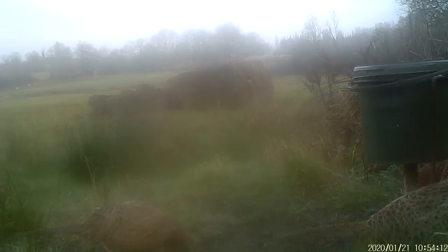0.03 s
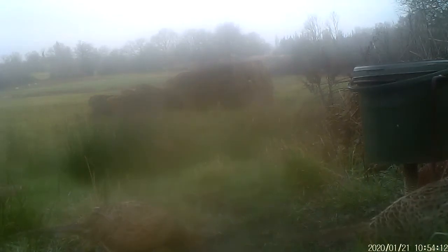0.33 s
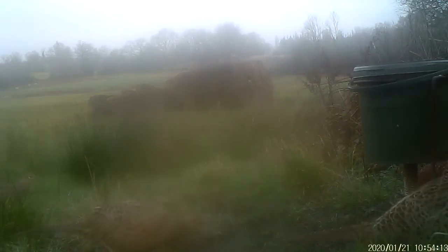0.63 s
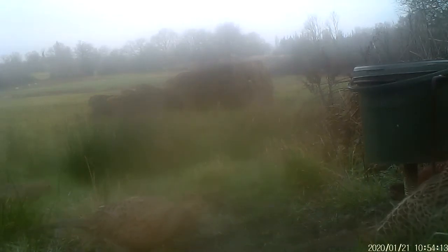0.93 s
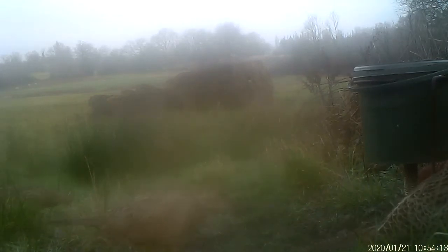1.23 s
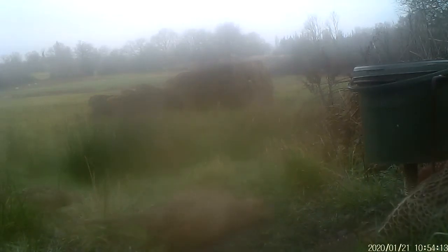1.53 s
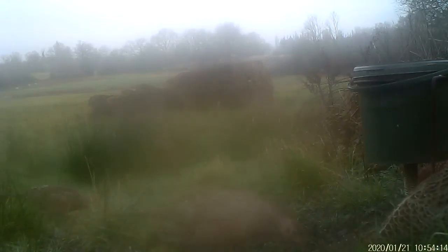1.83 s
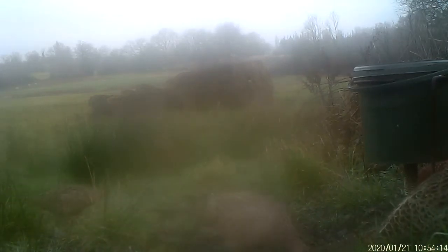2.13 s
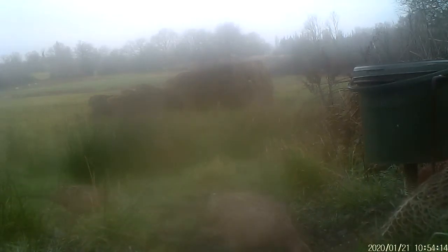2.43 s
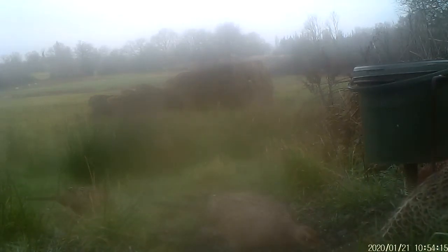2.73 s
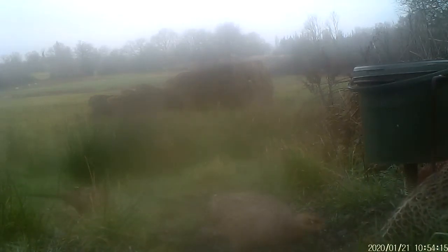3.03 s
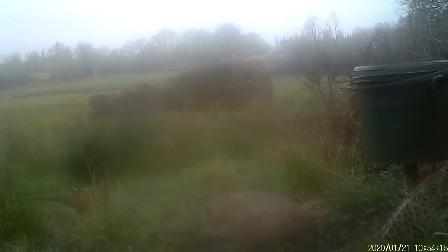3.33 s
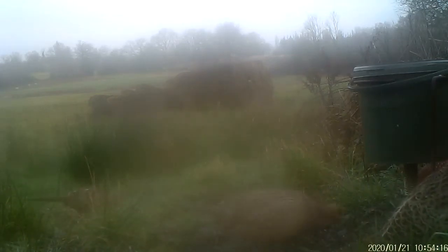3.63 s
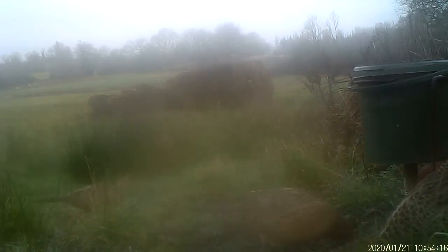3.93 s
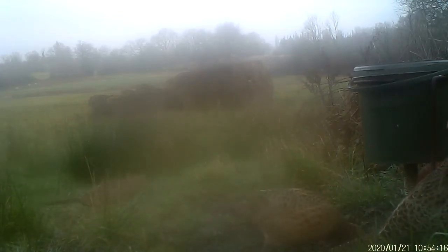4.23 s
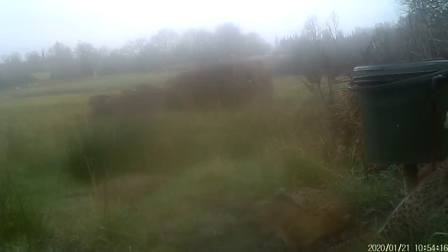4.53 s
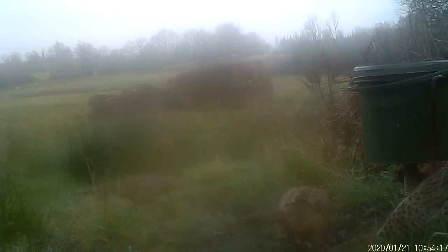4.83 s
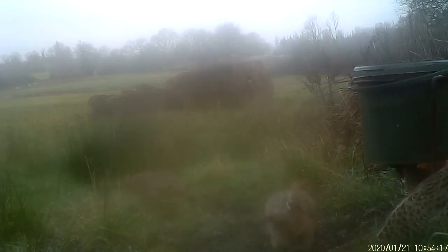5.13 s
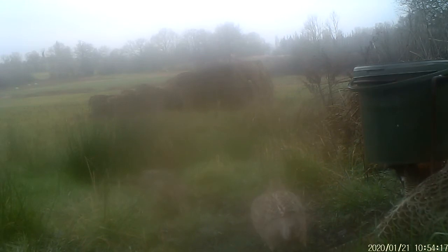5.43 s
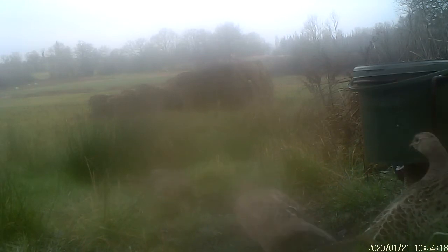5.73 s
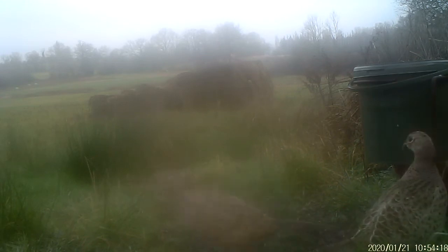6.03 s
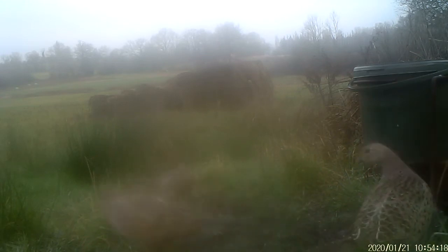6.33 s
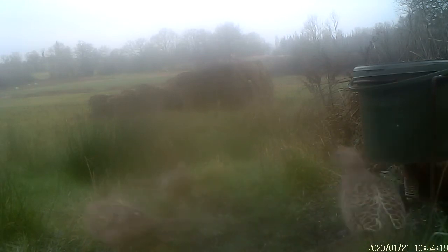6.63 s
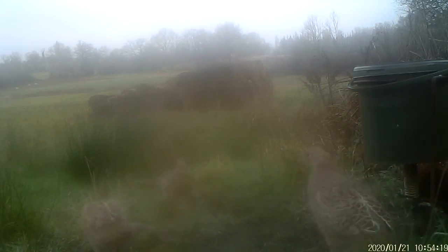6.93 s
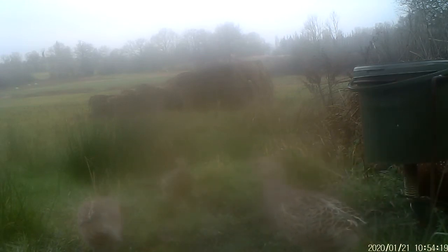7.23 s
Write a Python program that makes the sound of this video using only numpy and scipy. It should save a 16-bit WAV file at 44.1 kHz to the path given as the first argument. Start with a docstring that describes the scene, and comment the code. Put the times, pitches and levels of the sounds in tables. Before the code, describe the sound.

After a sharp switch-on pop and a faint wing flutter, quiet field hiss carries a far bird and light pheasant steps.

```python
"""Pheasants walk through a foggy field, the grass rustling and ticking under their feet.
Each step bends stems and brushes blades, a swarm of tiny clicks; now and then a stalk snaps.
Small wings flutter off in whooshes and feather swishes, and a far bird gives two falling whistles.
A trail camera beside a feeder wakes at the start: its microphone switches on with a pop,
then the scene fades in on a bed of steady hiss and low outdoor rumble."""
import sys
import numpy as np
from scipy import signal
from scipy.fft import rfft, irfft
from scipy.io import wavfile

SR = 44100
rng = np.random.default_rng(int(sys.argv[2]) if len(sys.argv) > 2 else 0)


def persist_wave(psi):
    """Save psi, clipped to +-1, as 16-bit WAV."""
    counts = np.round(np.clip(psi, -1, 1) * 32767).astype(np.int16)
    wavfile.write(sys.argv[1], SR, np.atleast_2d(counts).T)


N = 325458
TIME = np.arange(N) / SR

# Levels are set ahead of the microphone's fade-in.
# EQ curve of the outdoor rumble: f/Hz, relative level/dB
RUMBLE_EQ = [(4.7, -32), (8.0, 0), (43, -1), (92, -13), (300, -22), (390, -55), (660, -120)]
# EQ curve of the microphone hiss: f/Hz, relative level/dB
HISS_EQ = [(180, -28), (320, 0), (500, -2), (900, -5), (1500, -7.5), (2800, -10.5), (5000, -14),
           (8000, -16), (12500, -17), (14900, -18), (15800, -22)]
# far whistles: start t/s, length/s, first f/Hz, last f/Hz, arch above a straight fall/Hz, level/dB
BIRD_WHISTLES = [(2.171, .31, 1546, 1296, -15.5, -60.5), (2.645, .265, 1790, 1390, 150.5, -63)]
# strokes of small wings: t/s, relative air level/dB, feather level/dB
WING_STROKES = [(.189, -23, -54), (0.229, -12, -56), (0.266, -6, -55), (0.304, 2, -56), (0.349, -3, -57),
                (0.397, -5, -52.5), (0.434, -14, -68)]
# dull ticks: t/s, peak level/dB
DULL_TICKS = [(0.588, -36), (0.64, -40), (0.679, -41), (0.717, -36)]
# snapping stalks: t/s, peak level/dB, centre f/Hz, width/octaves
STALK_SNAPS = [(.229, -36, 7000, 0.6), (3.753, -46, 4900, 0.34), (6.277, -45, 9500, 0.14),
               (6.844, -40, 9400, .2)]
# feet in the grass: middle t/s, length/s, blade level/dB, stem level relative to the blades/dB
FOOTSTEPS = [(.459, .012, -58, -12), (0.549, .014, -56, -5), (.589, .012, -57, -2),
             (6.232, 0.058, -62, -10), (6.287, .035, -61.5, -9), (6.818, .078, -58, -2),
             (7.027, 0.054, -63, -7)]


def gain_of(db):
    """Decibels to a gain factor."""
    return 10 ** (np.asarray(db) / 20)


def unit_rms(x):
    """Normalises to rms 1."""
    return x / np.sqrt(np.mean(x ** 2) + 1e-20)


def add(mix, start_s, sound):
    """Drops a sound into the mix at start_s."""
    part = mix[max(round(start_s * SR), 0):][:len(sound)]
    part += sound[:len(part)]


def shaped_noise(eq):
    """A noise bed shaped by an EQ curve, at rms 1."""
    hz, db = np.transpose(eq)
    bins = np.fft.rfftfreq(N, 1 / SR)
    curve_db = np.interp(np.log(bins + 1), np.log(hz + 1), db)
    return unit_rms(irfft(rfft(rng.standard_normal(N)) * gain_of(curve_db), N))


def band(x, hz, octaves):
    """Passes x through one bell-shaped resonance, at rms 1."""
    octaves_away = np.log2((np.fft.rfftfreq(len(x), 1 / SR) + 1) / hz) / octaves
    return unit_rms(irfft(rfft(x) * np.exp(-octaves_away ** 2 / 2), len(x)))


def drift(size, rate_hz):
    """Smooth random modulation, at about rms 1."""
    rolloff = np.exp(-(np.fft.rfftfreq(N, 1 / SR) / rate_hz) ** 2)
    return unit_rms(irfft(rfft(rng.standard_normal(N)) * rolloff, N))[:size]


def brush(length_s, hz, octaves, slips_per_s=4000, noise_floor=0.086):
    """Blades, stems or feathers slip past each other: a swarm of tiny clicks that swells and fades."""
    size = int(length_s * SR)
    slips = rng.standard_normal(size) * (noise_floor + (rng.random(size) < slips_per_s / SR))
    return band(slips, hz, octaves) * signal.windows.cosine(size)


def background(rumble_db=-46.5, hiss_db=-54.5):
    """The bed: low open-air rumble under microphone hiss, each wavering slightly in level."""
    rumble = shaped_noise(RUMBLE_EQ) * gain_of(rumble_db + 0.5 * drift(N, rate_hz=5.4))
    hiss = shaped_noise(HISS_EQ) * gain_of(hiss_db + 0.38 * drift(N, rate_hz=5.4))
    return rumble + hiss


def tree_line(dry, t60_s=0.7, wet_db=-9):
    """Far trees scatter a faint reverb tail back over the field."""
    t = TIME[:SR]
    echoes = rng.standard_normal(SR) * (rng.random(SR) < 2000 / SR) * gain_of(-60 * t / t60_s)
    return dry + gain_of(wet_db) * signal.fftconvolve(dry, echoes / np.linalg.norm(echoes))[:N]


def far_bird(attack_s=0.064, release_s=0.04, sag_db=-5, waver=0.0112, flutter_db=0.5):
    """Nearly pure whistles glide down an arch, sag in level halfway and get duller as they drop."""
    out = np.zeros(N)
    for start, length, first_hz, last_hz, arch_hz, db in BIRD_WHISTLES:
        t = np.arange(0, length, 1 / SR)
        progress = t / length
        arch = 4 * progress * (1 - progress)
        hz = first_hz + (last_hz - first_hz) * progress + arch_hz * arch
        phase = 2 * np.pi * np.cumsum(hz * (1 + waver * drift(len(t), rate_hz=48))) / SR
        overtone_gain = gain_of(48 * np.log2(hz / 1880))  # loses 48 dB per octave below 1880 Hz
        tone = np.sqrt(2) * (np.sin(phase) + overtone_gain * np.sin(2 * phase))
        envelope = np.minimum(t / attack_s, 1) * np.minimum((length - t) / release_s, 1)
        level = gain_of(db + sag_db * arch ** 10 + flutter_db * drift(len(t), rate_hz=30))
        add(out, start, tone * envelope * level)
    return out


def switch_on_pop(on_s, step_db=-13.5, settle_s=0.25, curve=0.96):
    """The microphone's bias voltage jumps, then drains away through its coupling capacitor."""
    age = np.maximum(TIME - on_s, 0)
    return gain_of(step_db) * (TIME >= on_s) * np.exp(-(age / settle_s) ** curve)


def wings(whoosh_s=0.0219, swish_s=0.039, swish_lag_s=0.005, dip_s=0.014, dip_lag_s=0.023):
    """A small bird takes off close by: a low whoosh, a feather swish, a pressure dip on each return."""
    out = np.zeros(N)
    size = int(whoosh_s * SR)
    for middle, air_db, feather_db in WING_STROKES:
        whoosh = band(rng.standard_normal(size), hz=225, octaves=0.43) * signal.windows.cosine(size)
        swish = brush(swish_s, hz=7700, octaves=0.58)
        dip = -np.hanning(int(dip_s * SR))
        add(out, middle - whoosh_s / 2, gain_of(air_db - 47) * whoosh)
        add(out, middle + swish_lag_s - swish_s / 2, gain_of(feather_db) * swish)
        add(out, middle + dip_lag_s - dip_s / 2, gain_of(air_db - 27) * dip)
    return out


def ticks(tick_s=0.00092):
    """Dull ticks: single short pressure pulses with no ring."""
    out = np.zeros(N)
    for middle, db in DULL_TICKS:
        add(out, middle - tick_s / 2, -gain_of(db) * np.hanning(int(tick_s * SR)))
    return out


def snapping_stalks(decay_s=0.00098):
    """Stalks break with a bright crack that dies almost at once."""
    out = np.zeros(N)
    t = TIME[:SR // 50]
    for start, peak_db, hz, octaves in STALK_SNAPS:
        crack = band(rng.standard_normal(len(t)), hz, octaves) * np.exp(-t / decay_s)
        add(out, start, gain_of(peak_db) * crack / abs(crack).max())
    return out


def pheasant_steps(blade_hz=8060, blade_octaves=0.5, stir_span_s=(5.55, 7.25), stir_db=-71.5):
    """Each step bends the stems, which ring briefly, and brushes the thin, brighter blades."""
    out = np.zeros(N)
    for middle, length, blade_db, stem_db in FOOTSTEPS:
        start = middle - length / 2
        blades = brush(length, blade_hz, blade_octaves)
        stems = brush(length, hz=4600, octaves=0.23)
        ring = brush(length / 2, hz=5150, octaves=0.04)
        add(out, start, gain_of(blade_db) * blades)
        add(out, start - 0.15 * length, gain_of(blade_db + stem_db) * stems)  # stems lead slightly
        add(out, middle - length / 4, gain_of(blade_db + stem_db - 1) * ring)
    # a pheasant close by stirs the grass faintly at random moments
    for start in rng.uniform(*stir_span_s, size=10):
        add(out, start, gain_of(stir_db) * brush(0.04, blade_hz, blade_octaves))
    return out


def scene():
    """The mono mix: the bed and the far bird behind close grass and wings."""
    ambience = background() + tree_line(far_bird())
    return (ambience + pheasant_steps() + snapping_stalks() + wings() + ticks())[None]


def record(dry, on_s=0.07256, held_db=-15, fade_from_s=0.51, fade_to_s=0.91, cutoff_hz=15800):
    """Silence, then the pop; the input is held low, opens ever faster and passes a high cut."""
    fade = np.clip((TIME - fade_from_s) / (fade_to_s - fade_from_s), 0, 1) ** 1.66
    gain = gain_of(held_db * (1 - fade)) * (TIME >= on_s)
    high_cut = signal.firwin(255, cutoff_hz, window=("kaiser", 8), fs=SR)
    return signal.oaconvolve(dry * gain + switch_on_pop(on_s), high_cut[None], "same", axes=1)


dry = scene()
out = record(dry)
persist_wave(out)
```